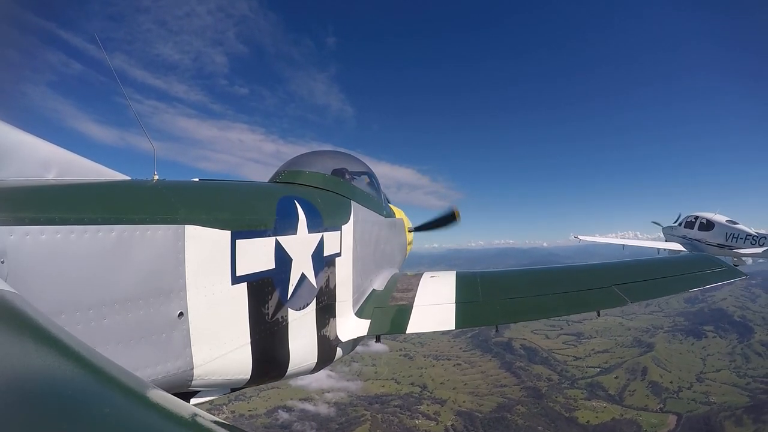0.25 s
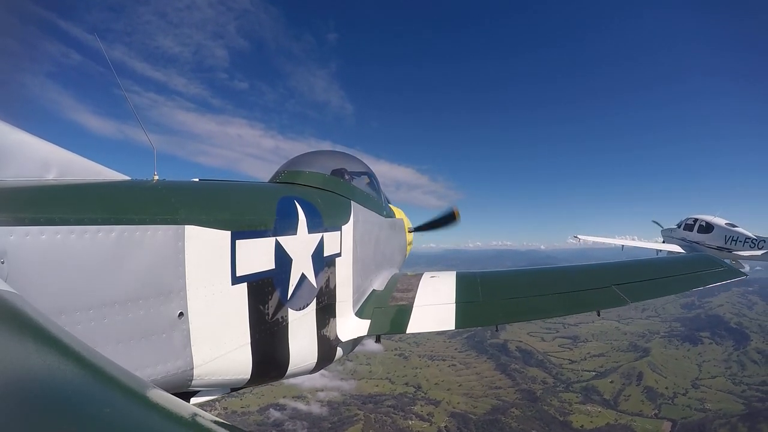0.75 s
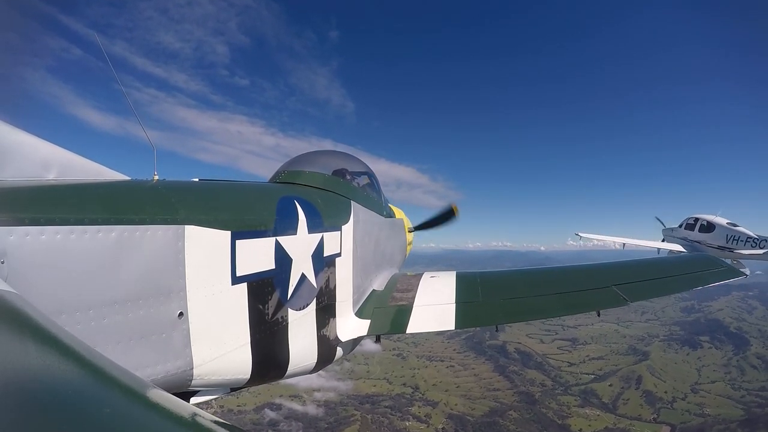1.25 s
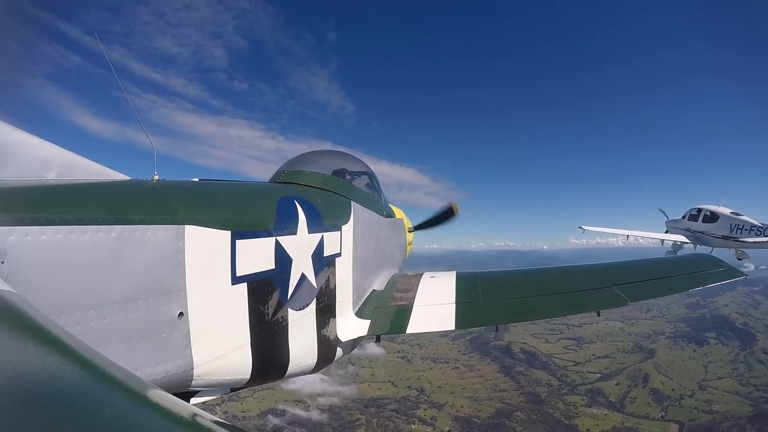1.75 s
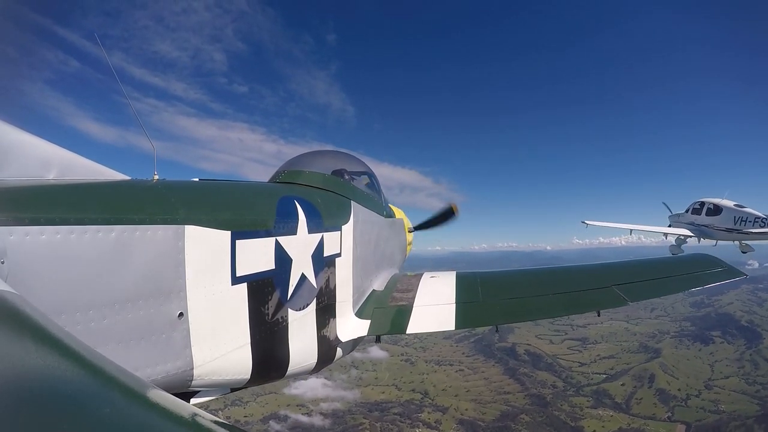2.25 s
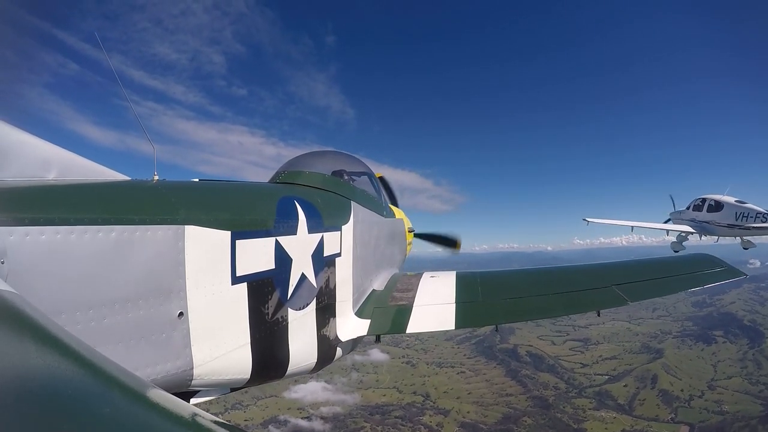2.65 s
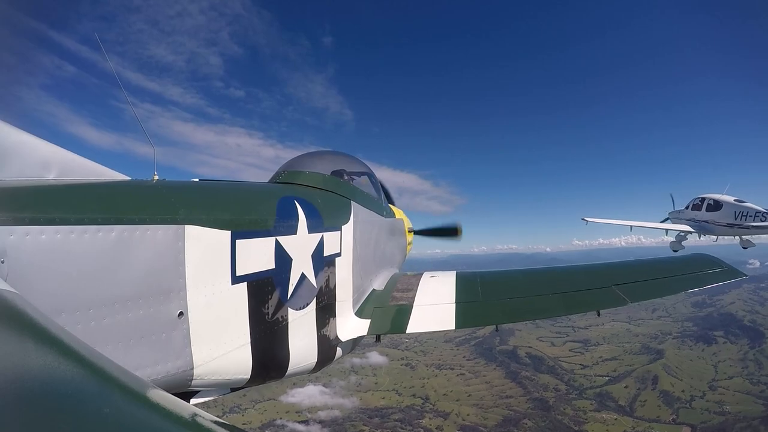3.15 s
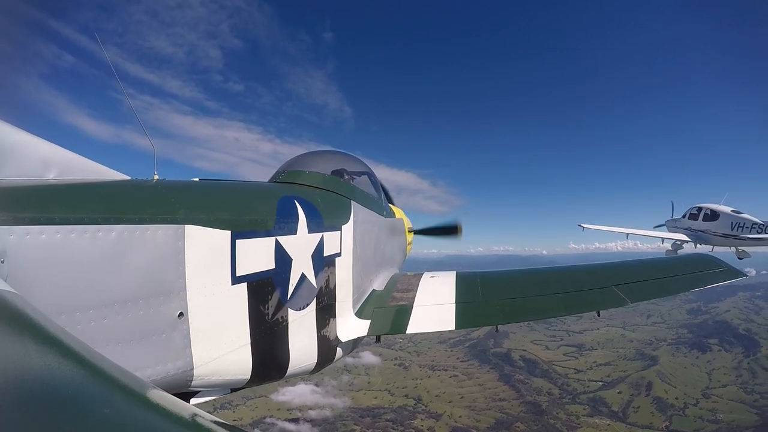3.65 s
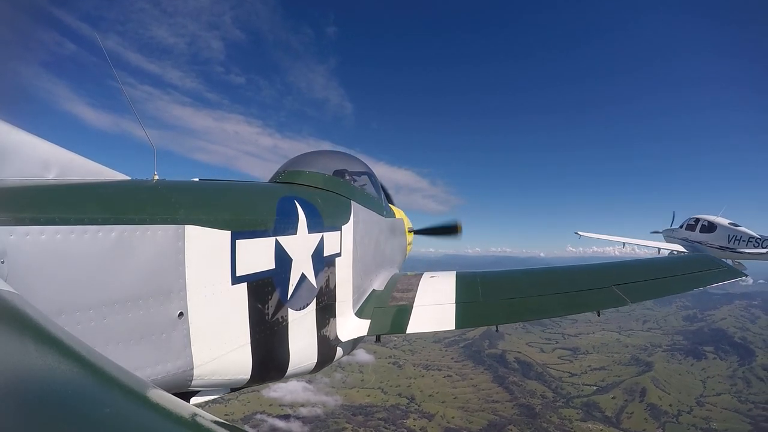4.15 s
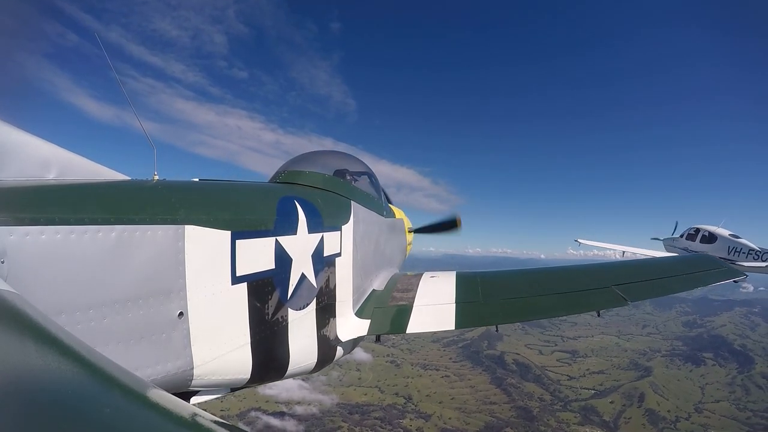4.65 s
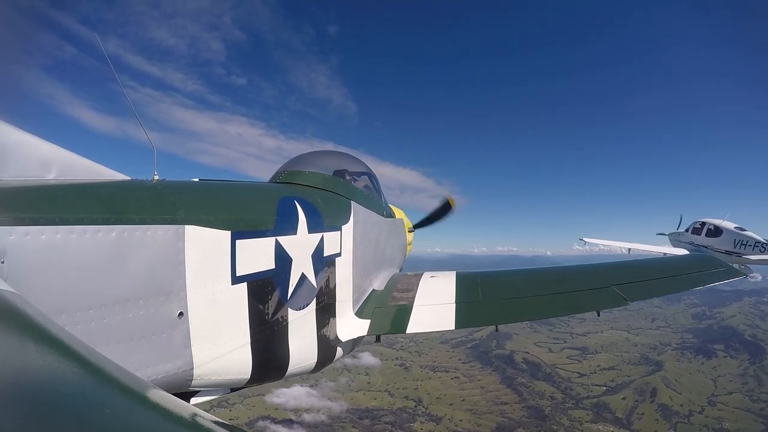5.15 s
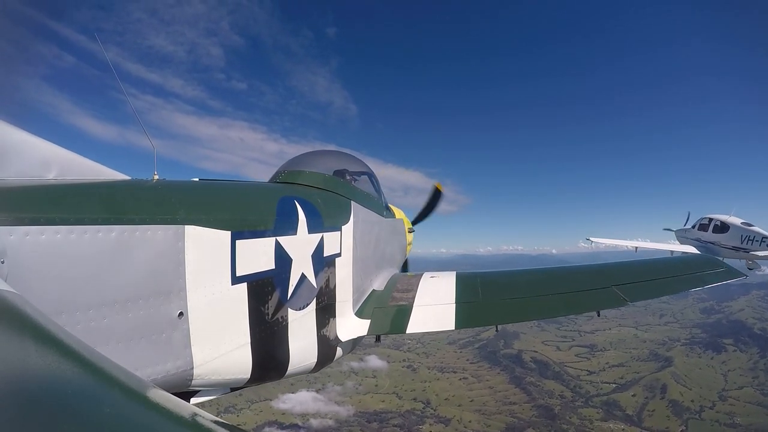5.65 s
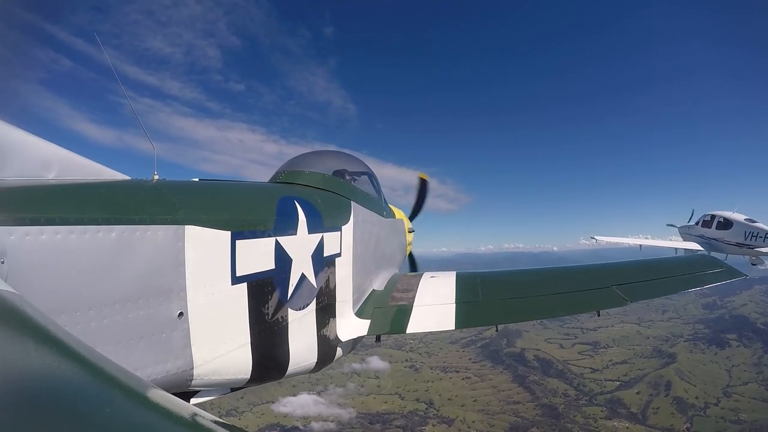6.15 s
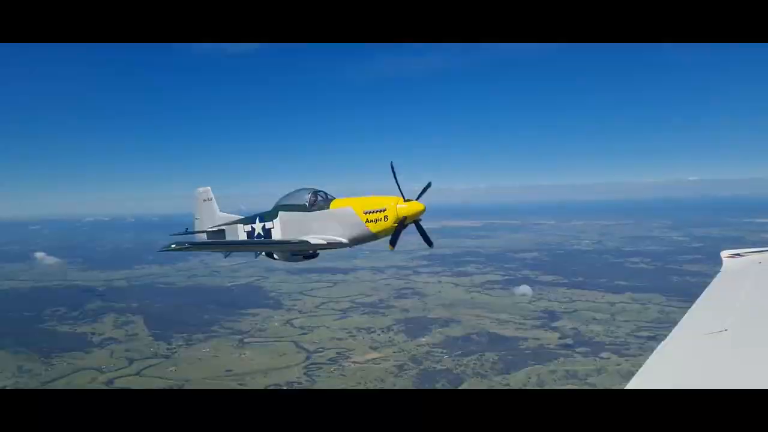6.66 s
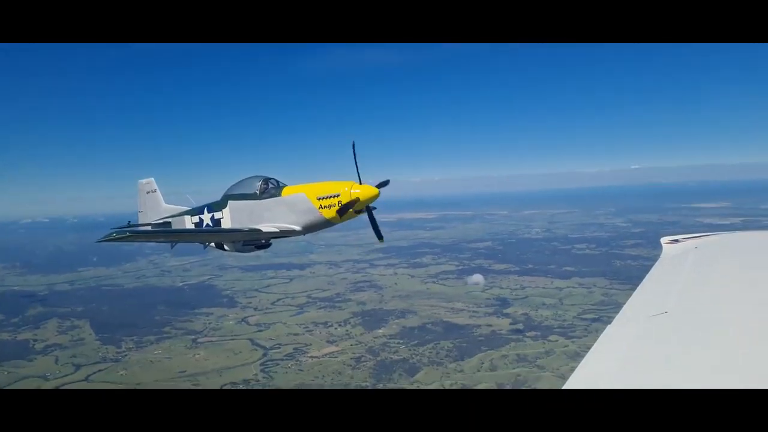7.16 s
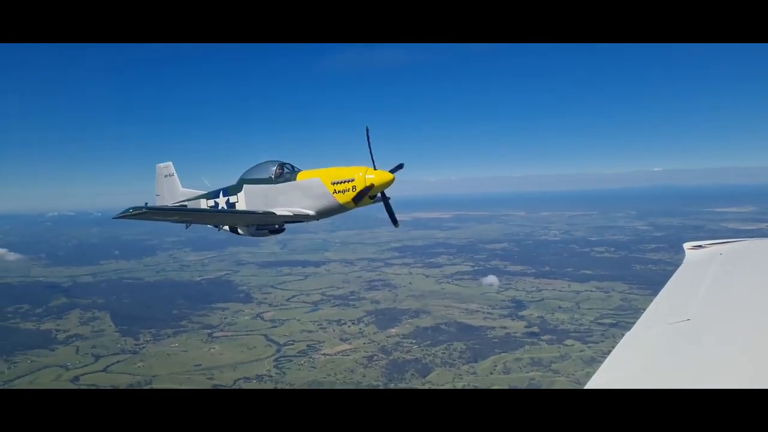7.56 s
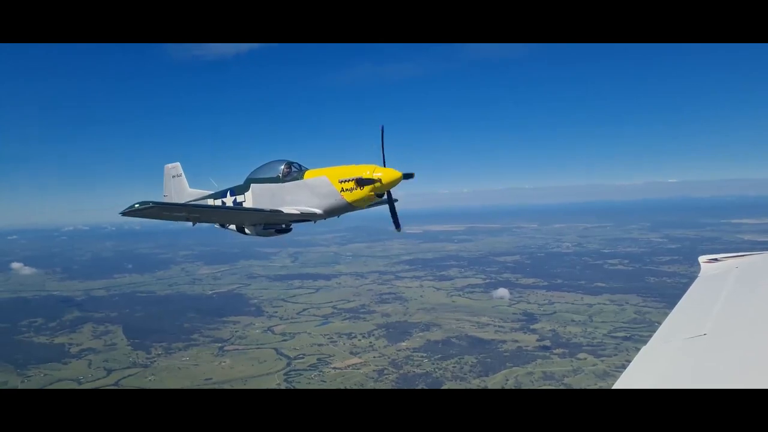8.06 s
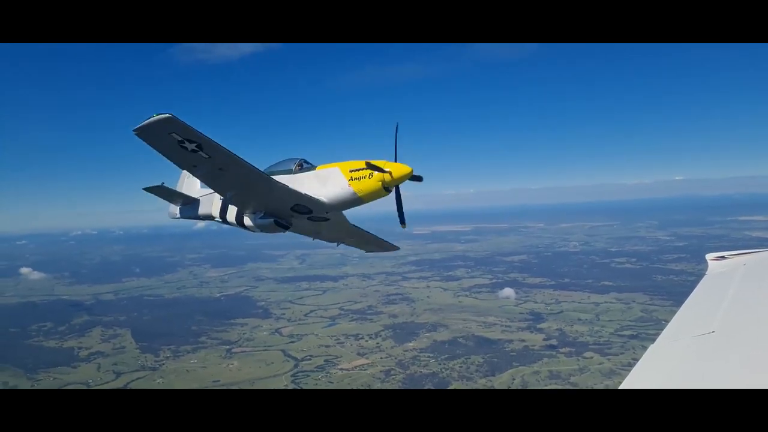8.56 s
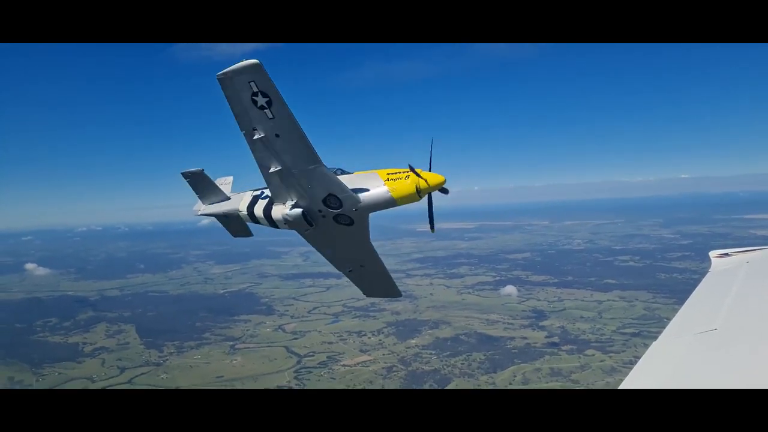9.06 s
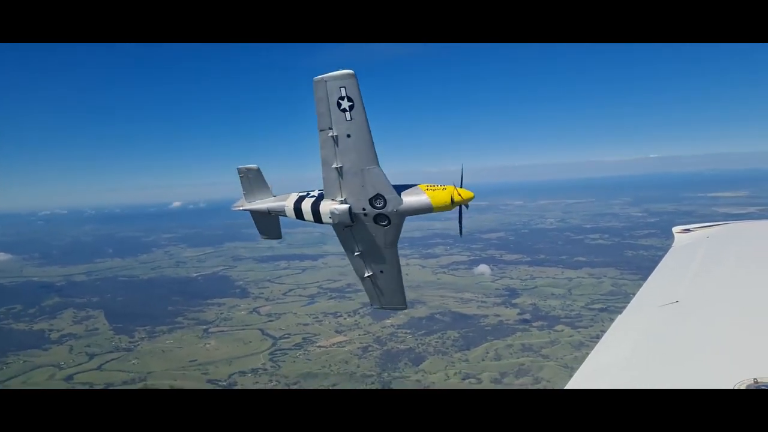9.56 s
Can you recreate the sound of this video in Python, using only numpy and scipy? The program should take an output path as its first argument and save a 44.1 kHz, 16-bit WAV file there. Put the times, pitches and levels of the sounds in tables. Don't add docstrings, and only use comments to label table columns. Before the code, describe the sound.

Harsh, buzzing piston-engine drone with crackling exhaust and rushing slipstream, then an abrupt cut to a deeper, booming light-aircraft cabin roar.

```python
import sys
import numpy as np
from scipy import signal
from scipy.fft import rfft, irfft, next_fast_len
from scipy.io import wavfile
from scipy.ndimage import uniform_filter1d

SR = 44100
rng = np.random.default_rng(int(sys.argv[2]) if len(sys.argv) > 2 else 0)


def level_to_linear(level):
    exponent = np.asarray(level, float) / 20
    return 10 ** exponent


def to_wav(sig):
    pcm = np.clip(np.atleast_2d(sig), -1, 1) * 32767
    pcm = np.round(pcm).astype(np.int16)
    wavfile.write(sys.argv[1], SR, pcm.T)


N = 432180
TIME = np.arange(N) / SR
CUT_S, RESUME_S = 6.6139, 6.6588
STRIDE = 4


def tail_camera():
    # time_s, cycle_hz
    tail_speed = [(0, 34.25), (2.4, 34.23), (3.4, 34.25), (4.7, 34.18), (6.6, 34.14)]
    turns = -.045 + cycles(tail_speed)
    span = slice(0, round(RESUME_S * SR))
    drone = exhaust_drone(turns, span) + propeller(span)
    return drone[0] + camera_mount(exhaust_puffs(turns) + slipstream())


def exhaust_drone(turns, span):
    # multiple, level_db
    exhaust_levels = [(2, -42.5), (9, -41), (16, -46), (24, -58.5)]
    # multiple, level_db
    stack_levels = [(25, -55.5), (31, -58.5), (36, -56), (42, -60), (59, -78)]
    exhaust_family_db = [1.5, -3.5, -4.5, 1.5, 4, -19]
    stack_family_db = [-1, 0, -21, -16, -6.5, 6.5]
    # multiple, width_multiples, lift_db
    pipes_table = [(5, .8, 6), (8, .8, 3), (11, .8, 9), (14, .8, -6), (19, .8, 8), (24, .8, -4),
                   (28, .8, 5), (31, .8, 7), (34, .8, -4), (42, .8, 3), (43, .8, -7), (45, .8, 6),
                   (49, .8, -5)]
    # multiple, level_db
    rattle = [(72, -58), (78, -59), (84, -61), (90, -59), (100, -58)]
    firing_db = -24
    low = []
    for k, db in orders(2, 24, exhaust_levels, exhaust_family_db, pipes_table):
        if k != 4:
            low.append((k, firing_db if k == 6 else db))
    high = orders(25, 59, stack_levels, stack_family_db, pipes_table) + rattle
    drone = tones(turns, low, unsteady_db=0.9, drift=.035, span=span, sweep=-.116)
    return drone + tones(turns, high, unsteady_db=1.5, drift=.026, span=span, sweep=.164)


def propeller(span):
    # shaft_multiple, level_db
    blade_levels = [(1, -31.5), (2, -46), (4, -48), (6, -57), (8, -56), (10, -60)]
    shaft_hz = 31.95
    return tones(shaft_hz * TIME, blade_levels, unsteady_db=0, drift=.046, span=span, sweep=.1053)


def exhaust_puffs(turns):
    # freq_hz, density_db_per_hz
    near_spectrum = [(900, -100), (2000, -74), (2500, -74.5), (3300, -68.5), (3900, -73), (4600, -72.5),
                     (6500, -101), (9000, -100)]
    # freq_hz, density_db_per_hz
    crack_spectrum = [(4000, -100), (6500, -82.5), (8500, -85.5), (10000, -92), (12000, -91), (14000, -92),
                      (15300, -99)]
    # freq_hz, density_db_per_hz
    far_spectrum = [(500, -99), (1000, -71.5), (1900, -75), (3000, -77), (4800, -71), (6500, -75),
                    (9000, -83), (13000, -102)]
    near = bank(turns, offset=-.076, rise=.039, fall=.27, cylinder_db=[0, .5, -.5], scatter_db=1.5, repeat=.25)
    crack = bank(turns, offset=-.06, rise=.05, fall=.2, cylinder_db=[1.2, -1.5, .5], scatter_db=1.5, repeat=.01)
    far = bank(turns, offset=.322, rise=.04, fall=.39, cylinder_db=[.6, -.5, -.3], scatter_db=1.3, repeat=.12)
    puffs = filtered(near, density(near_spectrum))
    puffs += filtered(crack, density(crack_spectrum))
    puffs += filtered(far, density(far_spectrum))
    return level_to_linear(0.3 * wobble(3) + 0.45 * wobble(11)) * puffs


def bank(turns, offset, rise, fall, cylinder_db, scatter_db, repeat):
    firing = 3 * turns - offset + 3 * rise
    since_open = firing % 1 - 3 * rise
    index = np.floor(firing).astype(int) + 1
    count = N // 200
    sizes = level_to_linear(np.resize(cylinder_db, count) + scatter_db * rng.standard_normal(count))[index]
    puff = sizes * np.where(since_open < 0, np.exp(-(since_open / rise) ** 2), np.exp(-since_open / fall))
    steps = 1290
    alike = rng.standard_normal(steps)[(turns % 1 * steps).astype(int)]
    air = np.sqrt(1 - repeat) * patchy(1.6)[0] + np.sqrt(repeat) * alike
    return air * puff / np.sqrt(np.mean(puff ** 2))


def slipstream():
    # freq_hz, density_db_per_hz
    hiss_spectrum = [(500, -95), (1100, -78), (2000, -78.5), (3600, -72), (6000, -75.5), (10000, -91),
                     (15000, -97)]
    # freq_hz, density_db_per_hz
    buffet_spectrum = [(12, -91), (28, -59), (65, -54), (150, -59.5), (300, -65), (520, -67), (780, -72.5),
                       (1500, -96)]
    return filtered(patchy(0.99)[0], lambda hz: np.hypot(density(hiss_spectrum)(hz), density(buffet_spectrum)(hz)))


def camera_mount(rush):
    # freq_hz, width_hz, lift_db
    housing = [(1950, 60, -5), (2480, 70, 4), (2660, 70, 3), (3080, 90, 2.5), (3400, 180, 2.5),
               (3700, 260, 3), (3820, 70, 3.5), (4320, 70, -6), (4410, 80, 3), (4680, 70, 2), (5110, 90, 3),
               (5260, 60, -4), (5460, 70, -3), (6430, 80, -3)]
    top_hz = 15300
    return filtered(rush, lambda hz: bumps(housing, hz) * ripple(hz) * (hz < top_hz))


def ripple(hz):
    depth_db, spacing_hz, from_hz = 2.2, 55, 1800
    knots = rng.standard_normal(int(SR / 2 / spacing_hz) + 2)
    knots = np.clip(knots - uniform_filter1d(knots, size=4), -1.5, 1.2)
    return level_to_linear(depth_db * np.interp(hz / spacing_hz, np.arange(len(knots)), knots) * (hz > from_hz))


def cabin():
    span = slice(round(CUT_S * SR), N)
    return cabin_boom(span) + neighbour_hum(span) + neighbour_crackle() + cabin_roar()


def cabin_boom(span):
    # time_s, cycle_hz
    cabin_speed = [(6.6, 21.317), (7.8, 21.33), (9.8, 21.333)]
    # multiple, left_db, right_db
    mode_levels = [(3, -28, -31), (4, -29, -27), (6, -17, -14), (8, -33, -33), (9, -24, -26),
                   (11, -32, -32), (12, -20, -27), (14, -29.5, -35.5), (15, -22, -23), (18, -22, -26),
                   (21, -35, -25), (24, -27, -31), (26, -25, -33), (27, -37, -26)]
    # multiple, level_db
    between_levels = [(2, -36), (13, -43.5), (20, -39), (25, -40), (34, -43.5), (42, -51)]
    silent = (5, 7, 16, 17, 19, 20, 23, 30, 35, 36, 39, 40, 41)
    # freq_hz, lead_radians
    left_lead = [(60, -.8), (128, 0), (200, .45), (260, -0.4), (390, -1.7), (450, 0.34), (550, .6),
                 (600, 4)]
    strong = [row[0] for row in mode_levels]
    weak = []
    for k, db in orders(2, 42, between_levels, [0]):
        if k not in strong and k not in silent:
            weak.append((k, *(db + 1.5 * rng.standard_normal(2))))
    return tones(cycles(cabin_speed), mode_levels + weak, unsteady_db=0.1, drift=.07, span=span, sweep=.408,
                 lead=lambda k: along(left_lead, k * cabin_speed[0][1]))


def neighbour_hum(span):
    # pitch_hz, left_db, right_db
    hum_levels = [(102.75, -26.5, -25), (205.5, -31, -32), (1130, -62, -50), (3113, -59, -53)]
    return tones(TIME, hum_levels, unsteady_db=1.0, drift=.086, span=span, lead=lambda hz: 0)


def neighbour_crackle():
    # freq_hz, left_db_per_hz, right_db_per_hz
    crackle_spectrum = [(6500, -110, -125), (8350, -92, -101), (13000, -95, -100), (15700, -92, -100)]
    leader_cycle_hz = 34.23
    puffs = bank(leader_cycle_hz * TIME, offset=0, rise=.1, fall=.45, cylinder_db=[0, 0, 0], scatter_db=3, repeat=0)
    ports = np.array([puffs, np.roll(puffs, 430)])
    crackle = filtered(ports, lambda hz: np.array([density(crackle_spectrum, port)(hz) for port in (1, 2)]))
    return level_to_linear(1.5 * wobble(6)) * crackle


def cabin_roar():
    # freq_hz, left_db_per_hz, right_db_per_hz
    roar_spectrum = [(18, -72, -72), (52, -49, -49), (98, -47, -46.5), (197, -47.5, -48), (390, -52, -50),
                     (700, -53, -54), (1230, -62.5, -58.5), (3000, -89.5, -103)]
    # freq_hz, left_db_per_hz, right_db_per_hz
    hiss_spectrum = [(700, -80, -79), (1530, -59, -57.5), (2490, -70.5, -68), (5680, -77.5, -78.5),
                     (7000, -92.5, -110), (9000, -87, -96), (13000, -84, -89.5), (15700, -94, -95)]
    # freq_hz, correlation
    likeness = [(30, .9), (120, .8), (220, .4), (400, -.4), (966, -.6), (2480, -.15), (6000, 0.05)]
    # freq_hz, width_hz, left_db, right_db
    panels = [(359, 26, -1, 6.5), (660, 140, 4, 5.5), (920, 170, 2.5, 2), (1124, 100, -2.5, -6),
              (1460, 290, 1, 1.5), (1690, 240, -5, -4.5), (2370, 230, 3, -1), (3110, 86, -6, 5),
              (4650, 160, 0, 6), (10300, 550, -2, -8)]

    def share(hz):
        angle = np.arccos(np.clip(along(likeness, hz), -1, 1)) / 2
        return np.array([np.cos(angle), np.sin(angle)])

    def port(hz, column):
        air = np.hypot(density(roar_spectrum, column)(hz), density(hiss_spectrum, column)(hz))
        return air * bumps(panels, hz, column + 1)

    both, apart = filtered(patchy(0.83, channels=2), share)
    left = filtered(both + apart, lambda hz: port(hz, 1))
    right = filtered(both - apart, lambda hz: port(hz, 2))
    return level_to_linear(0.35 * wobble(1.97) + 0.45 * wobble(9)) * np.array([left, right])


def cycles(speed):
    return np.cumsum(np.interp(TIME, *np.transpose(speed))) / SR


def orders(first, last, envelope, family_db, pipes=()):
    rows = []
    for k in range(first, last + 1):
        smooth_db = np.interp(k, *np.transpose(envelope))
        rows.append((k, smooth_db + family_db[k % len(family_db)] + lift_db(pipes, k)))
    return rows


def tones(turns, rows, unsteady_db, drift, span, sweep=0, lead=None):
    out, t = 0, TIME[span][::STRIDE]
    for multiple, *db in rows:
        angle = 2 * np.pi * (multiple * turns[span][::STRIDE] - sweep * multiple ** 2)
        angle = angle + drift * np.sqrt(multiple) * wobble(9, t)
        sides = [[0]] if lead is None else [[lead(multiple) / 2], [-lead(multiple) / 2]]
        level = np.sqrt(2) * level_to_linear(np.array(db)[:, None] + unsteady_db * wobble(7, t))
        out = out + level * np.cos(angle + sides)
    full = signal.resample_poly(out, STRIDE, 1, axis=1, window=("kaiser", 12))
    return np.pad(full, ((0, 0), (span.start, N)))[:, :N]


def wobble(rate, t=TIME):
    knots = rng.standard_normal(int(N * rate / SR) + 3)
    return np.interp(t * rate, np.arange(len(knots)), knots)


def patchy(patchy_db, channels=1):
    z = signal.stft(rng.standard_normal((channels, N), dtype=np.float32), nperseg=512)[2]
    field = uniform_filter1d(rng.standard_normal(z.shape[1:]), size=6, axis=0)
    field = uniform_filter1d(field, size=10, axis=1)
    return signal.istft(z * level_to_linear(patchy_db * field / field.std()), nperseg=512)[1][:, :N]


def filtered(x, response):
    m = next_fast_len(N + 8192)
    return irfft(rfft(x, m) * response(np.fft.rfftfreq(m, 1 / SR)), m)[..., :N]


def density(points, column=1):
    return lambda hz: level_to_linear(along(points, hz, column)) * np.sqrt(SR / 2)


def along(points, hz, column=1):
    table = np.transpose(points)
    return np.interp(np.log(hz + 1), np.log(table[0] + 1), table[column])


def bumps(rows, hz, column=2):
    return level_to_linear(lift_db(rows, hz, column))


def lift_db(rows, hz, column=2):
    return sum(row[column] / (1 + (2 * (hz - row[0]) / row[1]) ** 2) for row in rows)


def scene():
    jump_s, jump_db, sag_s, sag_db_per_s = 6.5792, 11, 6.607, 800
    edit_db = jump_db * np.clip((TIME - jump_s) / .0015 + .5, 0, 1)
    edit_db -= sag_db_per_s * np.maximum(TIME - sag_s, 0)
    tail_gain = level_to_linear(edit_db) * (TIME < CUT_S)
    cabin_gain = np.clip((TIME - RESUME_S) / .00056, 0, 1)
    return tail_gain * tail_camera() + cabin_gain * cabin()


def top_cut(x):
    return signal.sosfilt(signal.butter(12, 15640, fs=SR, output="sos"), x)


def record(dry):
    ceiling = .86
    held = dry / (1 + np.abs(dry / ceiling) ** 8) ** (1 / 8)
    return top_cut(held)


dry = scene()
out = record(dry)
to_wav(out)
```